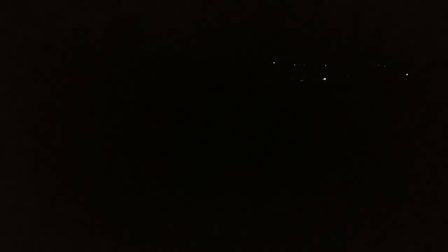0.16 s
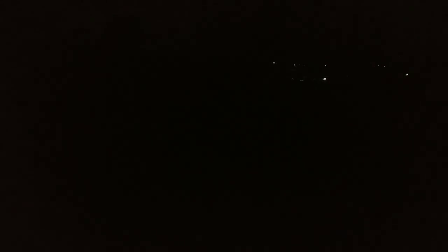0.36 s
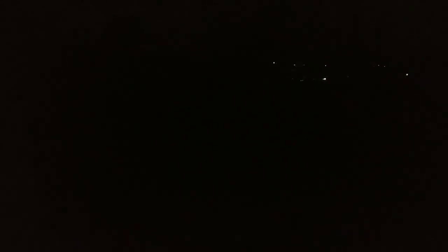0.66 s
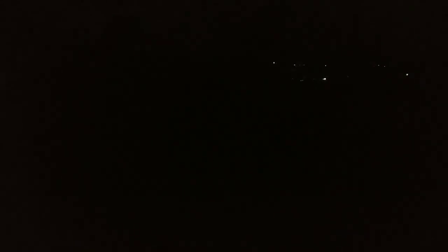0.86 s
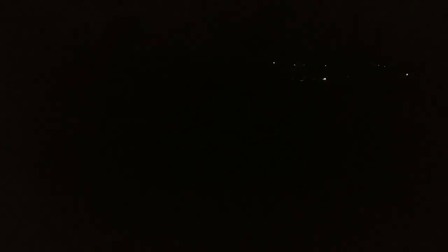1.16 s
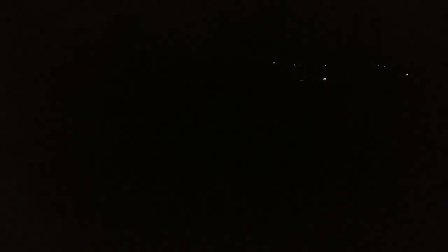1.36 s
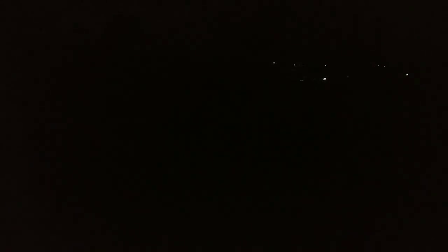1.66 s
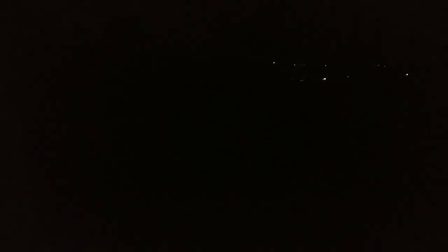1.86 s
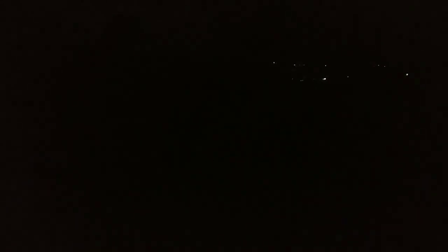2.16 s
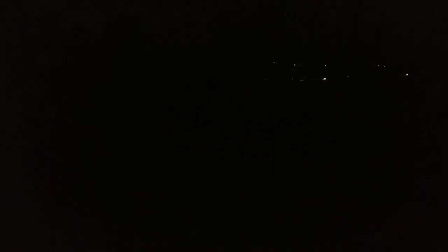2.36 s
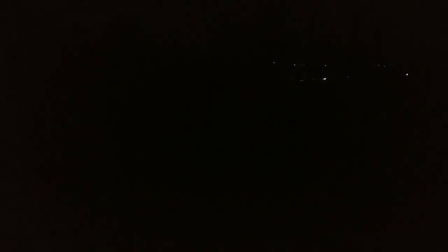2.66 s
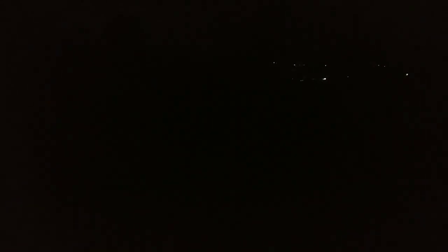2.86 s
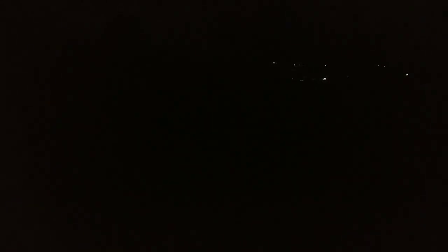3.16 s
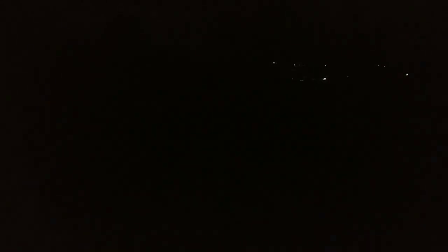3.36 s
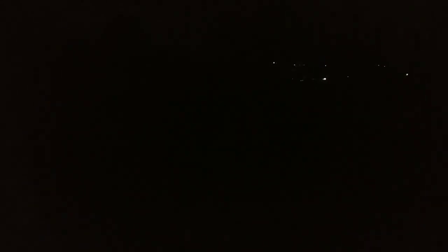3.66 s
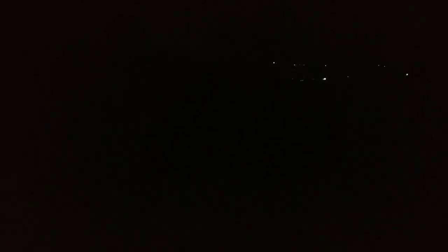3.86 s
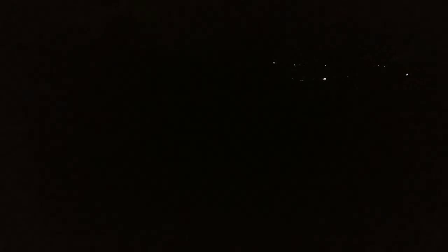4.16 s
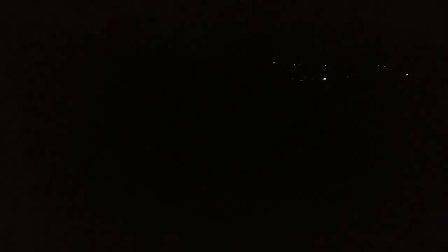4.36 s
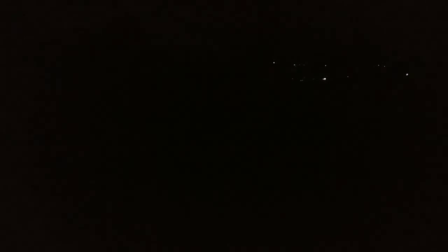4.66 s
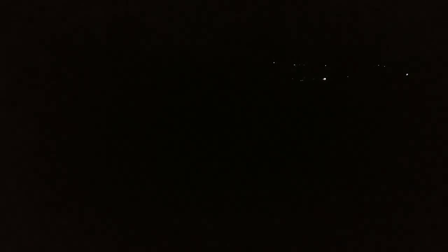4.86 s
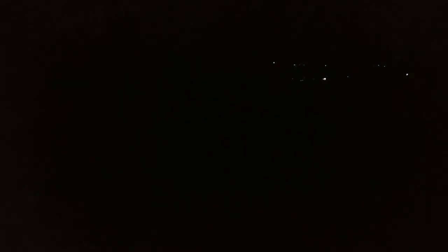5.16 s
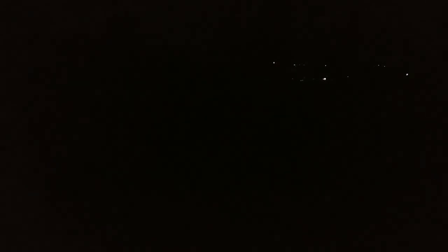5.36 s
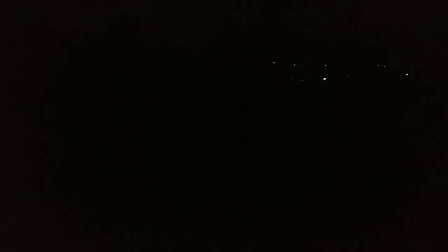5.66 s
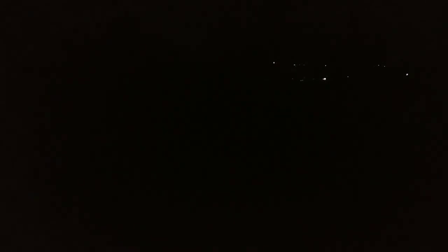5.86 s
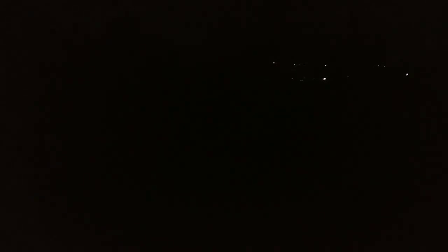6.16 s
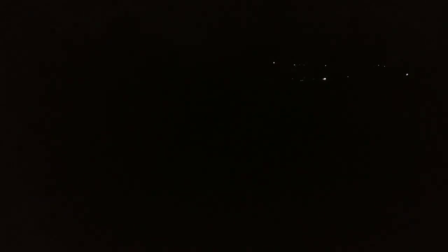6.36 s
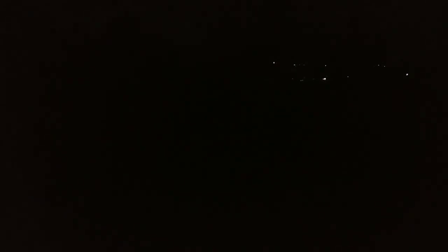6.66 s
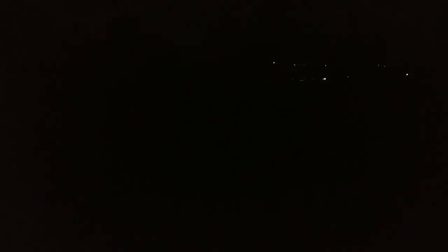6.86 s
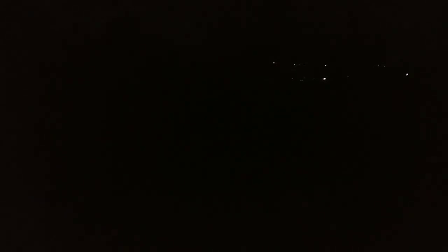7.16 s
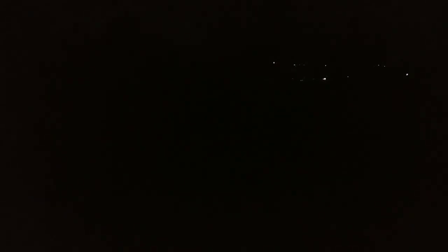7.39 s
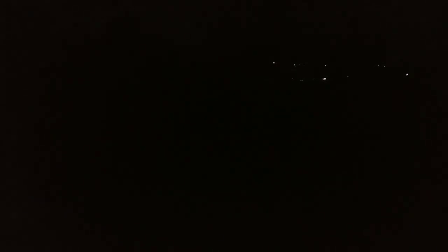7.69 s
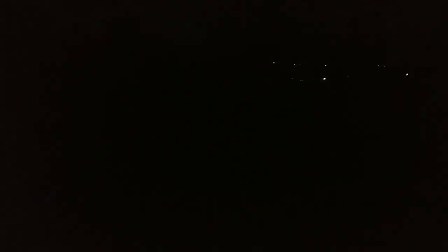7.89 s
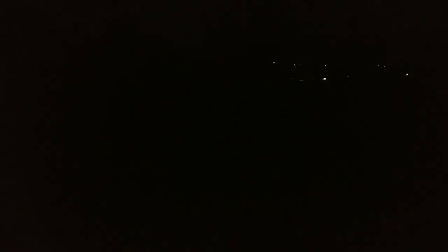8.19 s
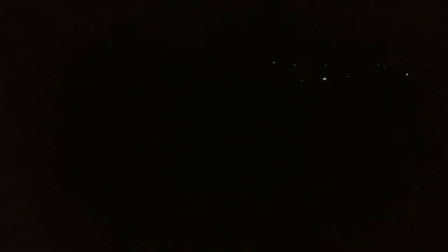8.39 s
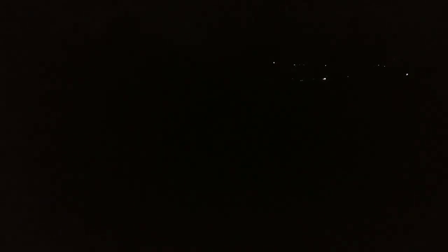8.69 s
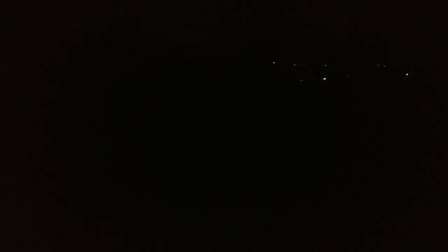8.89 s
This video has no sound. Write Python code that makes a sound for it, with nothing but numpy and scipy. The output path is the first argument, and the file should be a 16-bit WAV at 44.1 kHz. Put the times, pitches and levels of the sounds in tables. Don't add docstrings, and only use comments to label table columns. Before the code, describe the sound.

A steady, bright, sizzling bush-cricket song dominates a dark field, its fast wing strokes fluttering evenly close to both microphones. Other insects blur into hiss behind. Two groups of three lower, clearer cricket chirps come from the right, near the start and again in the later part. Beneath lie faint air and a far engine passing, its wavering hum sliding downward, plus faint distant hoots.

```python
import sys
import numpy as np
from scipy import signal
from scipy.fft import rfft, irfft
from scipy.io import wavfile

SR = 44100
rng = np.random.default_rng(int(sys.argv[2]) if len(sys.argv) > 2 else 0)


def bounce(signal):
    frames = np.transpose(np.atleast_2d(signal))
    limited = np.clip(frames, -1, 1)
    pcm = np.round(limited * 32767).astype(np.int16)
    wavfile.write(sys.argv[1], SR, pcm)


def nominal_scale(level):
    x = np.asarray(level, float) / 20
    return 10 ** x


N = 398223
TIME = np.arange(N) / SR
HZ = np.maximum(np.fft.rfftfreq(N, 1 / SR), 1)


def in_time(rows):
    s, *columns = np.transpose(rows)
    return [np.interp(TIME, s, c) for c in columns]


def over_hz(rows):
    hz, *columns = np.transpose(rows)
    return np.array([np.interp(np.log(HZ), np.log(hz), c) for c in columns])


def rms_one(x):
    return x / np.sqrt(np.mean(np.abs(x) ** 2))


def drift(rate):
    points = rng.standard_normal(2000)
    return np.interp(TIME * rate * 2, np.arange(2000), points) * 1.2


def bump(x):
    return np.cos(np.pi * np.clip(x, -.5, .5)) ** 2


def stereo_noise(alike):
    mid, side = rfft(rng.standard_normal((2, N)))
    alike = np.clip(alike, -.99, .99)
    shared = np.sqrt(1 + alike) * mid
    apart = np.sqrt(1 - alike) * side * [[1], [-1]]
    return (shared + apart) / np.sqrt(2)


def scatter(t60, left_db, right_db, tail_db):
    decay_db = -60 * np.arange(5000) / SR / t60
    paths = rng.standard_normal((2, 5000)) * nominal_scale(tail_db + decay_db)
    paths[:, 0] = nominal_scale([left_db, right_db])
    return paths


STROKES_PER_S = 25.72
# time in seconds, lead on the steady beat in strokes.
STROKE_LEAD = [(0.0, 0.32), (0.8, 0.341), (1.35, 0.331), (2.5, 0.265), (3.1, 0.318), (3.8, 0.286),
               (4.85, 0.266), (6.3, 0.358), (7.1, 0.316), (8.3, 0.373), (9.03, 0.372)]


def stroke_place(centre, length):
    strokes = STROKES_PER_S * TIME + in_time(STROKE_LEAD)[0] + 0.014 * drift(7.2)
    period = 1000 / STROKES_PER_S
    from_centre = (strokes * period - centre + period / 2) % period - period / 2
    return from_centre / length


# centre in ms, length in ms, start in Hz,
# end in Hz, left level and right level in dB over the chorus.
TOOTH_RUNS = [
    (20.85, 6.67, 6050, 8400, 5.5, 8),
    (20.9, 7.2, 11000, 17000, 8, 1),
    (19.94, 4.8, 6300, 6580, 13, 16),
    (10.02, 18, 2300, 2950, 8, 4.5),
]


def tooth_runs(rough_hz, rough):
    out = np.zeros((2, N))
    shake = signal.butter(2, rough_hz, fs=SR, output="sos")
    for centre, length, start, end, *ears_db in TOOTH_RUNS:
        place = stroke_place(centre, length)
        pitch = (start + end) / 2 + (end - start) * np.clip(place, -.5, .5)
        teeth = rng.standard_normal(N) + 1j * rng.standard_normal(N)
        uneven = rms_one(signal.sosfilt(shake, teeth))
        turn = 2 * np.pi * np.cumsum(pitch) / SR
        tone = ((1 + rough * uneven) * np.exp(1j * turn)).real
        share = np.sqrt(2 * (end - start + rough_hz) / SR)
        out += nominal_scale(np.c_[ears_db] + 2.0 * drift(8.8)) * share * bump(place) * tone
    return out


# centre in ms, length in ms, pitch in Hz, width in Hz,
# left level and right level in dB over the chorus.
SCRAPES = [(10.1, 10.9, 6970, 960, 6, 9), (1.51, 12.3, 7070, 1070, 4, 4), (19.3, 29, 8900, 1340, 0, -20),
           (12.9, 26, 8880, 1230, -2.5, 2.5), (10.2, 13.8, 11060, 1430, 4, 12.5),
           (12.4, 23, 14100, 4200, 5, 1), (21, 8.1, 14000, 420, -4, 9), (27.1, 3, 21000, 500, 10, -9),
           (32.8, 4.5, 12700, 600, -22, 2), (28.4, 10, 6400, 500, -14, 7.5),
           (21.4, 9.8, 2350, 400, -6, 7.5), (34.4, 6.5, 2100, 110, 11, 8), (11, 9.6, 2200, 730, -29, 11.5),
           (26.35, 2.9, 6170, 470, 4, -1)]


def scrapes(flicker_db):
    out = np.zeros((2, N))
    white = irfft(stereo_noise(1.0), N)
    for k, (centre, length, hz, width, *ears_db) in enumerate(SCRAPES):
        band = signal.butter(2, [hz - width / 2, hz + width / 2], "band", fs=SR, output="sos")
        strikes = np.roll(white, 9001 * k, axis=1)
        struck = strikes * np.sqrt(bump(stroke_place(centre, length)))
        out += nominal_scale(np.c_[ears_db] + flicker_db * drift(22)) * signal.sosfilt(band, struck)
    return out


def chorus(flicker_db):
    out = np.zeros((2, N))
    white = stereo_noise(0.88)
    centres = np.log([1500, 2500, 4000, 6000, 7200, 8600, 10500, 13000])
    for one in np.eye(len(centres)):
        band = irfft(white * np.interp(np.log(HZ), centres, one), N)
        out += band * nominal_scale(flicker_db * (drift(5) + 0.09 * drift(1.298)))
    return out


def foliage(peaks):
    out = np.ones(len(HZ), complex)
    for hz, width, db in peaks:
        away = (HZ / hz - hz / HZ) * hz / width
        half = nominal_scale(db / 2)
        out *= (half + 1j * away) / (1 / half + 1j * away)
    return out


# pitch in Hz, left and right level in dB per Hz.
WING_COLOUR = [(1290, -85.5, -88), (1980, -82, -85), (2375, -74, -80), (3040, -82, -76.5), (3795, -92, -90),
               (4240, -81, -84.5), (4590, -70, -62.5), (4975, -75, -76), (4970, -66.5, -80.5),
               (6220, -52, -54), (7330, -52, -61), (8430, -56.5, -62.5), (9390, -60, -63.5),
               (9590, -66, -69), (9760, -73.5, -67.5), (10100, -67, -82), (11800, -70, -80),
               (13000, -69, -69.5), (14300, -74, -72), (15400, -71, -68)]
# pitch in
# Hz, width in Hz, gain in dB.
FOLIAGE_LEFT = [(2749, 201, -8.2), (3051, 98, -9.3), (3733, 159, -7.6), (3992, 47, -9.9), (4644, 222, -6.7),
                (5104, 81, -6.5), (5346, 429, -13.6), (5525, 178, 4.6), (6009, 499, -10.1),
                (6336, 76, -2.8), (6664, 136, -5.7), (6882, 67, -3.0), (6998, 35, 1.4), (7223, 56, -6.0),
                (7616, 237, -8.4), (7897, 35, 6.2), (8091, 499, -7.1), (8470, 36, -4.4), (8614, 61, 5.2),
                (8926, 89, 12.0), (9026, 267, -12.6), (9084, 148, 11.9), (9948, 204, -6.2),
                (10502, 150, -4.1), (10631, 72, 3.1), (11859, 113, -3.1), (12209, 149, -4.7),
                (13447, 113, -4.9), (14948, 499, -7.6), (15068, 67, 6.8),
                (2497, 40, 4.0), (3746, 90, 4.2), (4672, 220, -3.7), (5103, 60, 5.0), (5426, 60, -3.6),
               (5878, 60, 4.0), (6244, 40, 3.7), (6524, 40, 2.3), (6782, 60, 4.4), (7041, 550, -0.8),
               (7170, 40, 2.9), (7428, 40, 2.7), (7493, 40, -2.7), (7773, 40, 3.7), (8161, 350, 1.9),
               (8333, 40, -3.0), (8699, 40, 2.7), (8957, 40, -2.7), (9323, 140, -3.2), (9776, 140, 5.0),
               (10658, 140, -2.1), (11025, 60, 4.0), (11218, 90, -4.5), (11800, 350, 2.2), (12338, 40, 3.3),
               (12575, 60, 5.0), (13565, 60, 4.1), (14491, 60, -4.7), (15137, 350, -2.8)]
# pitch in
# Hz, width in Hz, gain in dB.
FOLIAGE_RIGHT = [(2762, 117, -8.0), (3041, 73, -9.2), (3417, 155, 7.5), (3736, 35, -5.7), (3915, 70, 7.6),
                 (3996, 42, -6.0), (4332, 38, 3.4), (4616, 174, -8.2), (4966, 141, 7.6), (5553, 211, 4.3),
                 (6054, 399, -10.4), (6317, 42, 4.1), (6620, 118, -7.9), (6805, 170, -11.7),
                 (6843, 257, 9.0), (7183, 35, -4.5), (7427, 324, 4.4), (8047, 74, -3.0), (8119, 58, 2.7),
                 (8545, 121, 3.6), (8904, 169, 7.4), (9561, 188, 6.4), (9944, 141, -5.6), (10802, 499, 5.9),
                 (11470, 101, 5.5), (12232, 175, -6.4), (13411, 175, -5.4), (14788, 499, -6.3),
                 (14803, 44, 4.8), (14958, 57, -6.0),
                 (3746, 350, 4.0), (4069, 60, 2.9), (4694, 220, -4.6), (4931, 90, -1.9), (5103, 60, 5.0),
                (5404, 140, -2.4), (6029, 350, 2.3), (6201, 40, 2.5), (6459, 40, -3.5), (6826, 90, 2.0),
                (6933, 40, -2.6), (7019, 40, 2.7), (7170, 40, -4.2), (7364, 60, -2.9), (7493, 40, 3.2),
                (7945, 350, 3.3), (8850, 40, 2.9), (9130, 40, -2.7), (9194, 40, 3.1), (9431, 90, -5.1),
                (9668, 140, -1.8), (10335, 350, 4.7), (11025, 60, 2.9), (11218, 60, -3.2),
                (12015, 350, 3.7), (13716, 90, 3.7), (14061, 60, -3.8), (14491, 60, -4.7),
                (15094, 350, -4.5)]
# pitch in Hz, signed likeness (1 alike, -1
LIKENESS = [(60, -0.096), (170, 0.89), (350, 0.61), (700, 0.39), (1200, -0.34), (1900, 0.46), (2300, 0.42),
            (4000, 0.46), (5100, -1.46), (5800, -0.087), (6480, -0.18), (7000, -0.79), (7500, 0.43),
            (9000, -0.69), (11000, -0.077), (13200, -0.39)]


def bush_crickets():
    strikes = chorus(flicker_db=1.26) + scrapes(flicker_db=0.5) + tooth_runs(rough_hz=303, rough=0.59)
    plants = np.array([foliage(FOLIAGE_LEFT), foliage(FOLIAGE_RIGHT)])
    colour = nominal_scale(over_hz(WING_COLOUR)) * np.sqrt(SR / 2) * plants
    colour *= rfft(scatter(0.17, -1.2, -1.5, tail_db=-41.0), N)
    colour *= HZ ** 4 / (HZ ** 4 + 1350.0 ** 4)
    colour[1] *= np.exp(.5j * np.pi * (1 - over_hz(LIKENESS)[0]))
    level_db = -2.5 + 0.26 - 0.0461 * TIME
    return irfft(rfft(strikes) * colour, N) * nominal_scale(level_db)


def stems(song):
    turn_rad, step_hz = .4, 140
    turn = turn_rad * np.interp(HZ / step_hz, np.arange(400), rng.standard_normal(400))
    return irfft(rfft(song) * np.exp(1j * turn * np.c_[[1, -1]]), N)


# first syllable in seconds, level in dB.
CHIRPS = [
    (0.917, -28),
    (1.157, -29.5),
    (1.395, -28.5),
    (6.451, -29.5),
    (6.65, -28.5),
    (6.966, -28),
]


def syllables():
    syllable_s, row_gap_s = .0362, 1.0
    pickup_db, warm_up_db = -9, -2.5
    out, last = [], -np.inf
    for s, db in CHIRPS:
        fresh = s - last > row_gap_s
        if fresh:
            out.append((s - syllable_s, db + pickup_db))
        out.append((s, db + warm_up_db * fresh))
        out += [(s + syllable_s, db), (s + 2 * syllable_s, db)]
        last = s
    return out


def field_cricket():
    strokes = syllables()
    place = np.linspace(-.5, .5, int(0.0354 * SR))
    pitch = 4660 - 1500 * np.maximum(place - .12, 0) - 200 * bump((place + 0.354) / 0.57)
    turn = 2 * np.pi * np.cumsum(pitch) / SR
    shape = nominal_scale(-4) * bump((place + 0.22) / 0.55) + bump((place - .2) / 0.55)
    rough = np.where(place < 0, 1.3, .6)
    slow = signal.butter(2, 350, fs=SR, output="sos")
    uneven = rms_one(signal.sosfilt(slow, rng.standard_normal((len(strokes), 2000))))[:, 200:]
    chirps = np.zeros(N)
    for (s, db), shake in zip(strokes, uneven):
        at = round((s - .024) * SR)
        chirps[at:at + len(place)] += nominal_scale(db) * shape * np.sin(turn + rough * shake[:len(place)])
    wing = signal.butter(4, [4180, 4880], "band", fs=SR, output="sos")
    grass = scatter(0.032, -21.0, 5.5, tail_db=-29.0)
    return signal.fftconvolve(signal.sosfilt(wing, chirps)[None], grass)[:, :N]


# time in seconds, firing rate in Hz, nearness in dB.
ENGINE = [
    (0.0, 27.03, -4.5),
    (1.1, 27.1, -5),
    (3.1, 26.93, -3.5),
    (4.0, 26.61, -2),
    (4.75, 26.18, 0),
    (5.8, 25.11, -1.5),
    (6.4, 24.49, -3.5),
    (7.5, 23.66, -2.5),
    (9.03, 23.53, -4),
]
# multiple of the firing rate, level in dB when nearest.
ENGINE_ORDERS = [(4, -72), (5, -59.5), (6, -58), (7, -55.5), (8, -82), (9, -53), (10, -52.5), (11, -63),
                 (12, -73), (13, -63.5), (14, -81), (15, -73), (16, -70)]
# centre in seconds, length in seconds,
# multiple of the firing rate, gain in dB.
WIND_CARRIES = [(3.202, 0.85, 9, 11.5), (3.642, 0.4, 9, 10.5), (3.702, 0.66, 7, 11.5), (4.242, 0.55, 7, 14),
                (4.678, 0.34, 7, 13.5), (4.6, 0.622, 5, 8.5), (4.996, 0.42, 9, 3), (5.62, 1, 7, 6.5),
                (6.2, 0.29, 7, 6), (6.452, 0.4, 9, 9), (6.833, 0.5, 7, 12.5), (7.42, 0.3, 7, 12),
                (2.47, 0.57, 9, 15), (5.2, 0.43, 6, 9), (7.2, 2, 5, 6), (7, 0.93, 10, 2),
                (4.85, 0.45, 10, 3.5), (2.33, 1.7, 7, 7), (4.8, 0.6, 4, 12), (6.3, 1.79, 4, 11),
                (4.94, 0.87, 13, 12), (5.4, 0.5, 11, 5), (2.6, 1.4, 6, 6), (5.6, 0.54, 11, 10.5),
                (6.2, 0.81, 7, 3), (4.28, 0.7, 5, 6), (5.0, 1, 15, 10)]


def far_engine():
    rate, near_db = in_time(ENGINE)
    turn = 2 * np.pi * np.cumsum(rate) / SR
    lines = np.zeros(N)
    for k, db in ENGINE_ORDERS:
        carried_db = np.zeros(N)
        for s, length, order, gain_db in WIND_CARRIES:
            if order == k:
                carried_db += gain_db * bump((TIME - s) / length)
        path_db = 2.15 * near_db + 2.5 * drift(1.4) + carried_db
        lines += nominal_scale(db + path_db) * np.sin(k * turn + .5 * drift(1.144))
    return lines * nominal_scale(np.c_[[-.6, .6]])


# centre in seconds, length in seconds, pitch in Hz, level in dB.
HOOTS = [
    (1.26, 0.22, 544, -58),
    (1.31, 0.21, 824, -58),
    (8.902, 0.36, 470, -54.5),
]


def hoots():
    out = np.zeros(N)
    for s, length, hz, db in HOOTS:
        out += nominal_scale(db) * bump((TIME - s) / length) * np.sin(2 * np.pi * hz * TIME)
    return out


# pitch in Hz, level in dB per Hz.
RUMBLE_COLOUR = [(15, -68), (25, -32), (107, -15.5), (118, -24.5), (179, -1.5), (281, -0.5), (348, -9.5),
                 (382, -2.5), (413, -8.5), (600, -13), (780, -65), (1320, -120)]
# pitch in Hz, level in dB per Hz.
AIR_COLOUR = [(240, -29), (400, -8.5), (507, -12.5), (788, -3.5), (889, -9), (1260, -11.5), (1700, -18),
              (2210, -33), (3740, -120)]


def night_air():
    alike = over_hz(LIKENESS)[0]
    rumble = rms_one(irfft(stereo_noise(alike) * nominal_scale(over_hz(RUMBLE_COLOUR)), N))
    rumble *= nominal_scale(-49.5 + in_time(ENGINE)[1])
    hiss = rms_one(irfft(stereo_noise(alike) * nominal_scale(over_hz(AIR_COLOUR)), N)) * nominal_scale(-57.5)
    return rumble * nominal_scale(np.c_[[-.6, .6]]) + hiss


def scene():
    song = stems(bush_crickets())
    return song + field_cricket() + far_engine() + hoots() + night_air()


def band_limit(x):
    return signal.sosfilt(signal.butter(12, 15520, fs=SR, output="sos"), x)


def record(dry):
    return band_limit(dry)


dry = scene()
out = record(dry)
bounce(out)
```